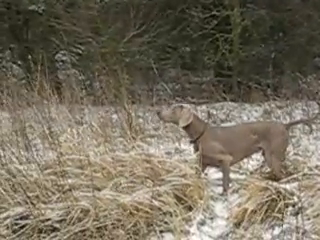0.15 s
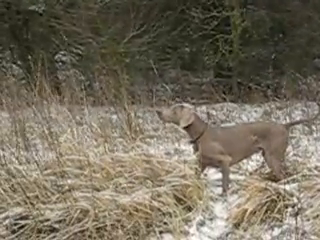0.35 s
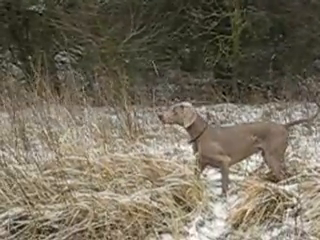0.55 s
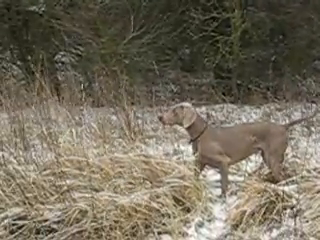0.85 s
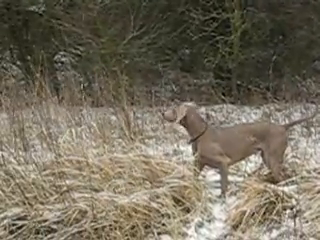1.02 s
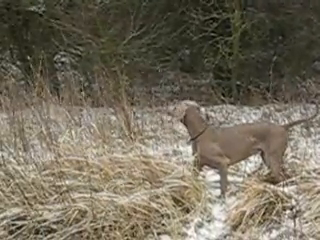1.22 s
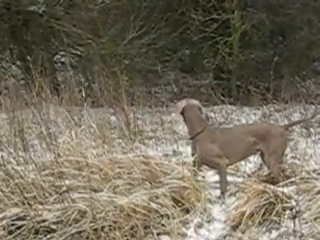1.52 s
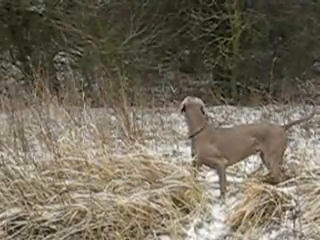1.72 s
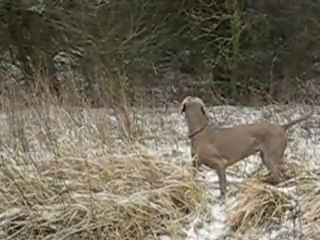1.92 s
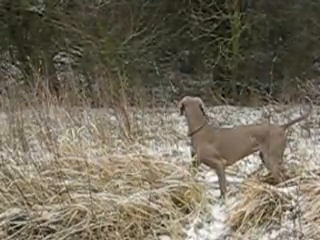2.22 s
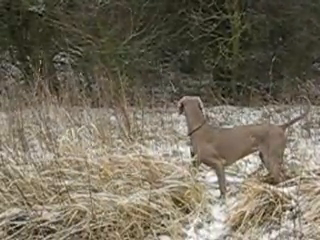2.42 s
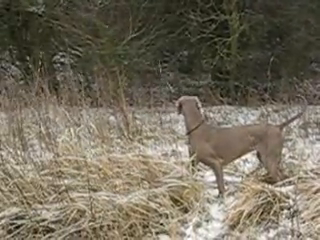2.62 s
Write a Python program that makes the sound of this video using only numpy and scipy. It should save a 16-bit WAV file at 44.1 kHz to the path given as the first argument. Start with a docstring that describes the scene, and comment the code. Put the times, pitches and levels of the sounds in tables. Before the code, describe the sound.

Rapid wing flutter of a bird flying off, whistling and snapping, weakens and stops near the end; low wind thumps, a few dry grass ticks and steady hiss, heard through a dull small outdoor microphone.

```python
"""A game bird bursts up from a snowy field and flies off at about thirteen wing beats a second.
Most beats are a rough swishing stroke (falling whistle, shaped noise, hollow tone) and then a short falling chirp.
Dry grass ticks as brief damped rings; the ground and a tree line return a bounce and a short tail.
Wind buffets a small camera microphone with low noise and single pressure bumps.
The camera adds flickering hiss, a thin steady whine and a steep low-pass near 6 kHz."""
import sys
import numpy as np
from scipy import signal
from scipy.fft import rfft, irfft, next_fast_len
from scipy.io import wavfile
from scipy.ndimage import map_coordinates

SR = 44100
rng = np.random.default_rng(int(sys.argv[2]) if len(sys.argv) > 2 else 0)


def dump(signal):
    """Clip the signal to [-1, 1] and save it as 16-bit WAV at the path in sys.argv[1]."""
    limited = np.clip(np.atleast_2d(signal).T, -1, 1)
    pcm = np.round(limited * 32767).astype(np.int16)
    wavfile.write(sys.argv[1], SR, pcm)


def gain_from_decibels(decibels):
    """Convert decibel values to linear amplitude factors."""
    exponent = np.asarray(decibels, float) / 20
    return 10 ** exponent


N = 121275  # length of the scene [samples]
T = np.arange(2048) / SR  # time within one short event [s]

# spectrum of the air noise under strokes and snaps: (frequency [Hz], relative density [dB])
AIR_SPECTRUM = [(700, -120), (900, 4.5), (1500, -2.5), (2200, 1), (2800, 5), (4200, -1.5), (5200, -12),
                (7000, -25)]


def unit(x):
    """Normalisation: scales a signal to rms 1."""
    return x / np.sqrt(np.mean(x ** 2) + 1e-20)


def along(points, hz):
    """Logarithmic frequency axis: interpolates (frequency [Hz], value) points."""
    f, v = np.transpose(points)
    return np.interp(np.log(hz + 1), np.log(f + 1), v)


def wobble(rate):
    """Slow random modulation: a spline through normal random knots, rate knots a second."""
    knots = rng.standard_normal(int(N * rate / SR) + 4)
    return map_coordinates(knots, [np.arange(N) * rate / SR])


def filtered(x, response):
    """Linear filtering: the spectrum multiplied by a response of frequency."""
    m = next_fast_len(N + 8192)
    return irfft(rfft(x, m) * response(np.fft.rfftfreq(m, 1 / SR)), m)[..., :N]


def noise(spectrum):
    """Coloured noise: white noise shaped by a spectrum, then scaled to rms 1."""
    return unit(filtered(rng.standard_normal(N), lambda hz: gain_from_decibels(along(spectrum, hz))))


def place(times, sounds):
    """Superposition: rows of sound summed at their start times [s]."""
    starts = np.round(np.asarray(times) * SR).astype(int)[:, None]
    at = starts + np.arange(sounds.shape[1])
    return np.bincount(at.ravel(), sounds.ravel(), N + SR)[:N]


def columns(table):
    """Matrix layout: each table column as a vertical array, one row an event."""
    return (c[:, None] for c in np.transpose(table))


def blow(t, rise, t60):
    """Impulsive excitation with damping: rounded rise, exponential fall, peak 1."""
    e = (1 - np.exp(-(t / rise) ** 2)) * gain_from_decibels(-60 * t / t60)
    return e / e.max()


def push(count, hz):
    """Compression: air squeezed under the wings gives a hollow low tone, its pitch scattered by 4 %."""
    pitch = hz * np.exp(.04 * rng.standard_normal((count, 1)))
    return np.sin(2 * np.pi * pitch * T)


def strokes():
    """Aerodynamic noise: feathers whistle, rustle and swish as the wing drives air, with a hollow push."""
    # wing strokes: (time [s], stroke level before the layer offsets [dB], hollow push over it [dB],
    # length [s], whistle's loudest moment [share of length])
    stroke_table = [(0.0, -28, 11, 0.0067, 0.62), (0.069, -42, 7.5, 0.017, 0.92),
                    (0.15, -35.5, 10, 0.0108, 0.84), (0.2293, -34.5, 2, 0.0097, 0.66),
                    (0.3087, -34.5, 2, 0.0067, 0.9), (0.3828, -30, 10, 0.013, 0.44),
                    (0.461, -35, 6.5, 0.0089, 0.28), (0.5363, -30.5, -1, 0.0088, 0.22),
                    (0.6106, -34, 0.5, 0.015, 0.37), (0.7693, -31, 9.5, 0.0096, 0.46),
                    (0.845, -31.5, 2, 0.014, 0.23), (0.922, -37.5, -14.5, 0.021, 0.83),
                    (1.001, -31.5, -0.5, 0.014, 0.57), (1.237, -26.5, 5.5, 0.013, 0.25),
                    (1.314, -30, 3, 0.008, 0.14), (1.3904, -32, 2, 0.007, 0.099),
                    (1.5427, -36.5, 5.5, 0.0094, 0.068), (1.618, -39.5, 4.5, 0.02, 0.83),
                    (1.694, -37, 8.5, 0.0098, 0.085), (1.771, -35, -0.5, 0.0099, 0.32),
                    (1.8445, -41, -2.5, 0.021, 1), (1.925, -35.5, -8, 0.013, 0.75),
                    (2.003, -41, -1, 0.016, 0.5), (2.084, -38, -8, 0.013, 0.3),
                    (2.164, -40, -21, 0.016, 0.4), (2.247, -42, 4.5, 0.0086, 0.41),
                    (2.328, -35, 1.5, 0.014, 0.3), (2.41, -34, 6.5, 0.017, 0.11),
                    (2.4897, -39, 7, 0.0122, 0.86)]
    # rustle of the feathers: (frequency [Hz], relative density [dB])
    rustle_spectrum = [(2300, -47), (2900, -3), (3400, -2.5), (4000, -12.5), (4800, -26)]
    whistle_hz, whistle_fall, whistle_db = 3400, .17, 4  # pitch at mid-stroke; fall as share of it per length
    lower_ratio, lower_db = .75, -10  # a longer feather whistles below
    flare_width = .4  # share of the stroke, centre to 1/e
    brisk_s, slow_db_per_s = .015, -1400  # longer strokes lose their whistle
    rustle_db, swish_db, push_hz = -10, -7, 585
    rough_rate = 280  # knots a second
    ragged_db, crackle_db, push_rough_db = 2, 3.5, 3  # depth of roughness: whistle, air, push

    s, db, push_db, length, flare = columns(stroke_table)
    times = s[:, 0]
    u = T / length
    arch = (1 - np.exp(-T / 0.00091)) * np.exp(-(u / 1.225) ** 4)

    phase = 2 * np.pi * whistle_hz * T * (1 + whistle_fall * (.5 - u / 2))
    tone = np.sin(phase) + gain_from_decibels(lower_db) * np.sin(lower_ratio * phase)
    onset = np.clip(T * 1000, 0, 1)  # 1 ms ramp
    tone = tone * onset * np.exp(-((u - flare) / flare_width) ** 2)
    tone_db = db + whistle_db + slow_db_per_s * np.maximum(length - brisk_s, 0)
    whistle = place(times, gain_from_decibels(tone_db) * tone) * gain_from_decibels(ragged_db * wobble(rough_rate))

    feathers = gain_from_decibels(rustle_db) * noise(rustle_spectrum) + gain_from_decibels(swish_db) * noise(AIR_SPECTRUM)
    air = place(times, gain_from_decibels(db) * arch) * feathers * gain_from_decibels(crackle_db * wobble(3 * rough_rate))

    hollow = place(times, gain_from_decibels(db + push_db) * arch * push(len(s), push_hz))
    return whistle + air + hollow * gain_from_decibels(push_rough_db * wobble(rough_rate))


def snaps():
    """Impulsive radiation: a wing snap is a damped falling chirp with a puff, the hollow tone just behind."""
    # wing snaps: (time [s], chirp level [dB], pitch 2.7 ms after the start [Hz], hollow push over it [dB])
    snap_table = [(0.019, -20, 3350, -14), (0.0812, -31.5, 3260, -25), (0.0936, -18, 3240, -2.5),
                  (0.157, -24, 3150, -14), (0.1702, -19.5, 3110, -2), (0.2475, -20, 3210, -8),
                  (0.325, -22.5, 3270, -8), (0.4033, -22, 3380, -0.5), (0.466, -19.5, 3270, -22),
                  (0.4797, -15.5, 3336, -5.5), (0.5569, -18, 3386, -11), (0.634, -18, 3430, -5.5),
                  (0.7161, -29, 3300, 0), (0.779, -24, 3220, -22), (0.7903, -17.5, 3510, -1.5),
                  (0.8672, -17.5, 3370, -5), (0.946, -18, 3535, -6), (1.023, -17.5, 3534, -3.5),
                  (1.1517, -32, 2290, -16), (1.2593, -24, 3230, -1), (1.467, -21, 3570, -8),
                  (1.4879, -24, 3260, -10.5), (1.714, -22.5, 3470, -35.5), (1.7913, -25, 3320, -8.5),
                  (1.8556, -29.5, 3030, -19), (1.869, -23.5, 3500, -3.5), (1.9465, -25, 3460, -1),
                  (2.1892, -28, 3200, -6), (2.4375, -29.5, 3050, -25), (2.4581, -29.5, 3050, -13)]
    rise_s, t60_s, fall_per_s = .0016, .0077, 45  # fall as share of the pitch per second
    puff_db = -12.5
    push_hz, push_lag_s, push_rise_s, push_t60_s = 500, .00097, .0016, .026

    s, db, hz, push_db = columns(snap_table)
    times = s[:, 0]
    shape = gain_from_decibels(db) * blow(T, rise_s, t60_s)
    cycles = hz * T * (1.12 - fall_per_s * T / 2)  # starts 12 % above the table pitch
    chirp = np.sin(2 * np.pi * (cycles + rng.random(s.shape)))
    puff = place(times, shape) * gain_from_decibels(puff_db) * noise(AIR_SPECTRUM)
    hollow = gain_from_decibels(db + push_db) * blow(T, push_rise_s, push_t60_s) * push(len(s), push_hz)
    return place(times, shape * chirp) + puff + place(times + push_lag_s, hollow)


def grass():
    """Damped resonance: dry stalks tick with a brief ring and a noisy crack."""
    # ticks: (time [s], level of the ring [dB])
    tick_table = [(0.324, -32.5), (0.842, -31), (2.009, -28), (2.045, -32), (2.404, -31.5), (2.415, -30.5),
                  (2.472, -34.5)]
    ring_hz, rise_s, t60_s = 5040, .00017, .0035
    s, db = columns(tick_table)
    crack = np.diff(0.33 * rng.standard_normal((len(s), len(T))), prepend=0)  # differencing brightens it
    ring = np.sin(2 * np.pi * ring_hz * T)
    return place(s[:, 0], gain_from_decibels(db) * blow(T, rise_s, t60_s) * (ring + crack))


def field(x):
    """Reflection and scattering: one bounce off the snow and a short diffuse tail from the tree line."""
    # decay of the tail: (frequency [Hz], t60 [s])
    tree_decay = [(300, 0.062), (2200, 0.36), (4200, 0.63), (6500, 0.25)]
    ground_s, ground_db = .006, -17
    trees_db, trees_delay = -14.5, 300  # delay in samples
    hz, t, z = signal.stft(rng.standard_normal(SR // 2), SR, nperseg=256)
    decay = gain_from_decibels(-60 * t / along(tree_decay, hz)[:, None])
    tail = signal.istft(z * decay, SR, nperseg=256)[1]
    tail = tail / np.linalg.norm(tail)
    ground = gain_from_decibels(ground_db) * np.pad(x, (round(ground_s * SR), 0))[:N]
    trees = gain_from_decibels(trees_db) * signal.fftconvolve(np.pad(x, (trees_delay, 0)), tail)[:N]
    return x + ground + trees


def wind():
    """Turbulent pressure on the membrane: lumpy buffeting, a spikier upper part, and bumps of about one swing."""
    # gusts: (time [s], buffeting level [dB], upper part over it [dB])
    gust_table = [(0, -38.5, -9), (.37, -39, -4), (.39, -34, -1.5), (.87, -27, -3.5), (1.05, -38, -3),
                  (1.17, -27, -16.5), (1.21, -43.5, -4.5), (1.31, -28, -5), (1.58, -31, -5),
                  (1.62, -27.5, -4), (1.82, -38, 0), (1.9, -29, -12), (2.01, -32, 0), (2.17, -32.5, -22.5),
                  (2.23, -37, -6), (2.36, -31.5, 5.5), (2.44, -32, 1), (2.58, -25.5, -6.5),
                  (2.75, -35.5, -0.5)]
    # spectra of the two parts: (frequency [Hz], relative density [dB])
    low_spectrum = [(10, -38.5), (30, 6.5), (80, 9), (160, -4.5), (300, -45)]
    upper_spectrum = [(60, -17), (110, 3), (250, -7.5), (420, -11.5), (900, -29.5), (1400, -71)]
    # bumps: (centre [s], signed peak pressure [full scale], approximate frequency of the swing [Hz])
    bump_table = [(.114, -0.24, 162), (0.444, -0.14, 110), (.656, -.12, 131.4), (.676, -0.17, 450),
                  (0.817, -.08, 293), (.728, 0.094, 130), (1.6241, 0.14, 149), (1.978, .1, 149),
                  (2.368, -0.27, 148.5), (2.3746, -.13, 200), (2.379, -0.18, 450), (2.477, -0.12, 167.5),
                  (2.531, 0.065, 170), (2.5478, 0.22, 264)]
    lump_db, gust_db, flutter_db = 0.74, 1.6, 2.7  # depth of the random level changes

    s, low_db, upper_db = np.transpose(gust_table)
    t = np.arange(N) / SR
    low = unit(gain_from_decibels(lump_db * wobble(18)) * noise(low_spectrum))
    low = low * gain_from_decibels(np.interp(t, s, low_db))
    spiky = gain_from_decibels(gust_db * wobble(25) + flutter_db * wobble(90))
    upper = unit(spiky * noise(upper_spectrum)) * gain_from_decibels(np.interp(t, s, low_db + upper_db))

    centre, peak, hz = columns(bump_table)
    u = (T - T.mean()) * hz * 4.64
    bump = peak * (1 - u ** 2) * np.exp(-u ** 2 / 2)  # one swing with two shallow opposite sides
    return low + upper + place(centre[:, 0] - T.mean(), bump)


def camera():
    """Electronic self-noise: broadband hiss that flickers a little, and a thin steady sine."""
    # hiss: (frequency [Hz], relative density [dB])
    hiss_spectrum = [(250, 1), (600, 2.5), (1200, -7), (2200, -5.5), (3500, -4), (4900, -11), (5600, -15),
                     (6400, -23), (7200, -56)]
    # whine: (frequency [Hz], rms level [dB])
    whine_table = [(2514, -60)]
    hiss_db, flicker_db, flicker_rate = -43.5, 0.8, 40.28  # rate in knots a second
    t = np.arange(N) / SR
    whine = sum(np.sqrt(2) * gain_from_decibels(db) * np.sin(2 * np.pi * hz * t) for hz, db in whine_table)
    return gain_from_decibels(hiss_db + flicker_db * wobble(flicker_rate)) * noise(hiss_spectrum) + whine


def scene():
    """Superposition: bird and grass reflected in the field, wind and camera added at the microphone."""
    outdoors = field(strokes() + snaps() + grass())
    return (outdoors + wind() + camera())[None]  # one channel


def top_cut(x):
    """Nothing passes above the cut-off."""
    return signal.sosfilt(signal.butter(12, 6930, fs=SR, output="sos"), x)


def record(dry):
    """Band limiting: a steep low-pass, then a trace of converter noise."""
    edge_hz, edge_order, converter_db = 5934, 11.5, -102.5

    def low_pass(hz):
        """Butterworth magnitude: 3 dB down at the edge, nothing from 7600 Hz."""
        return (hz < 7600) / np.sqrt(1 + (hz / edge_hz) ** (2 * edge_order))

    limited = filtered(dry, low_pass)
    faint = filtered(rng.standard_normal(dry.shape), lambda hz: hz < 15700)
    mix = limited + gain_from_decibels(converter_db) * faint
    return top_cut(mix)


dry = scene()
out = record(dry)
dump(out)
```